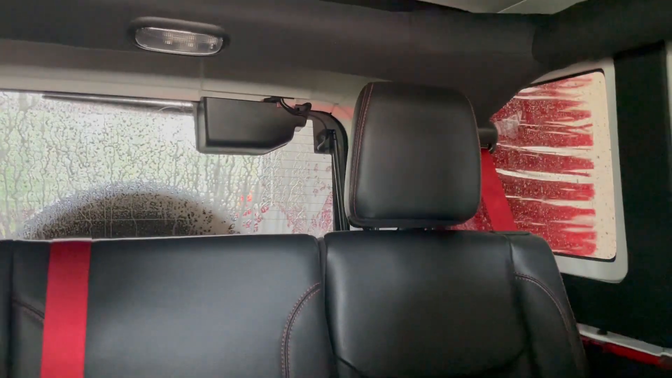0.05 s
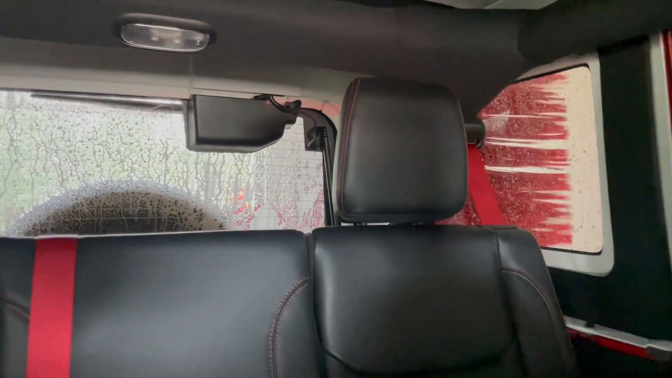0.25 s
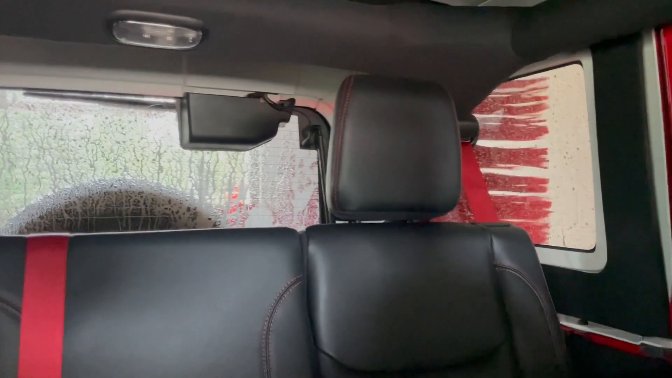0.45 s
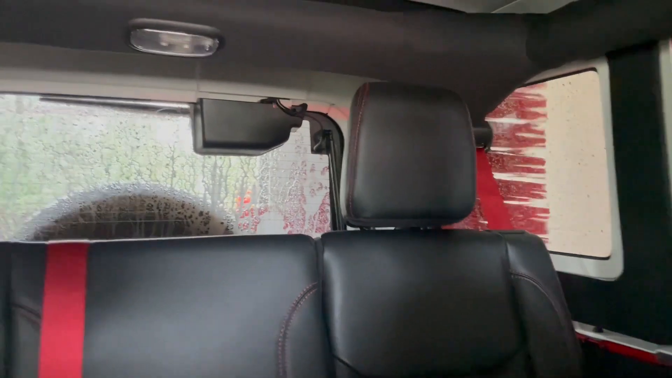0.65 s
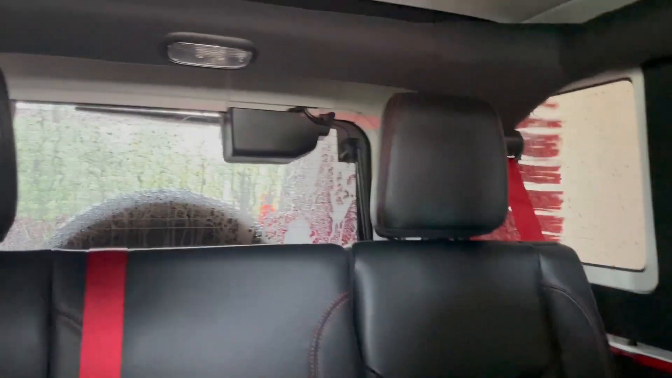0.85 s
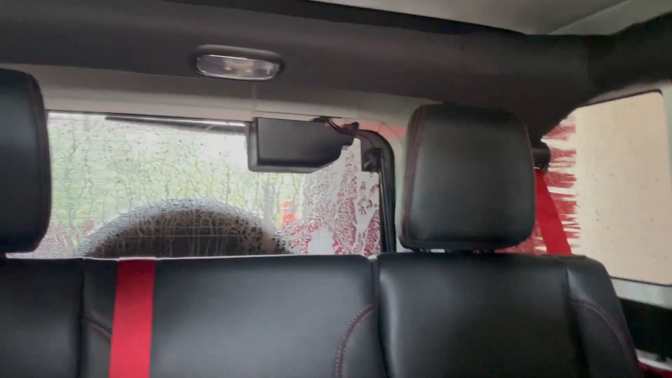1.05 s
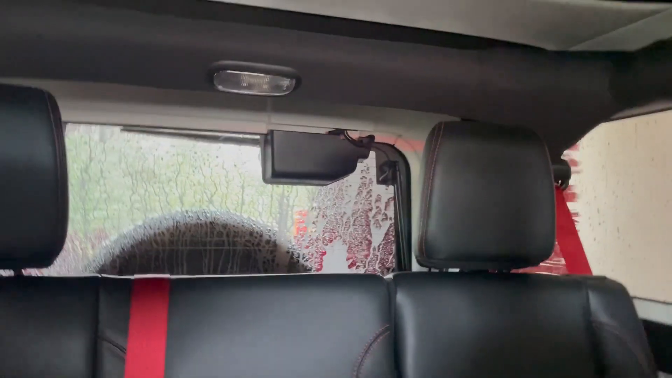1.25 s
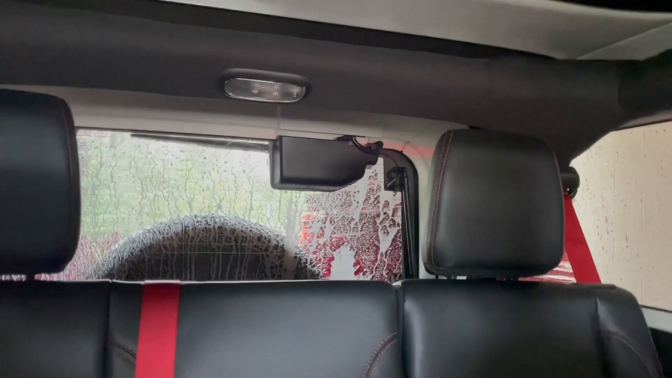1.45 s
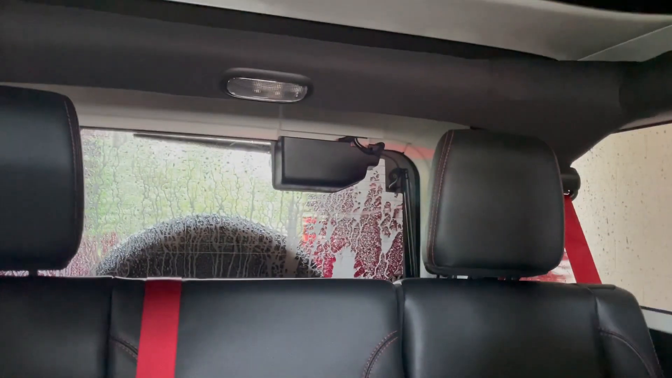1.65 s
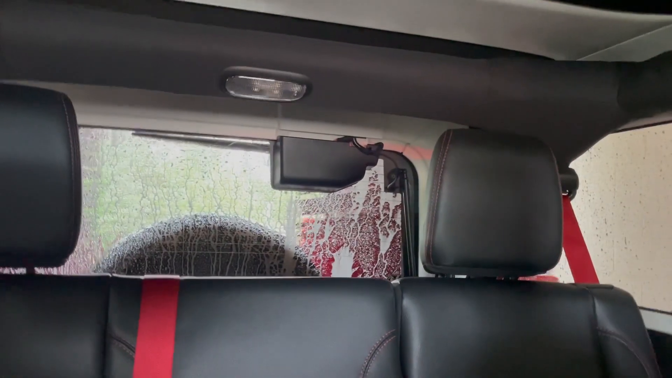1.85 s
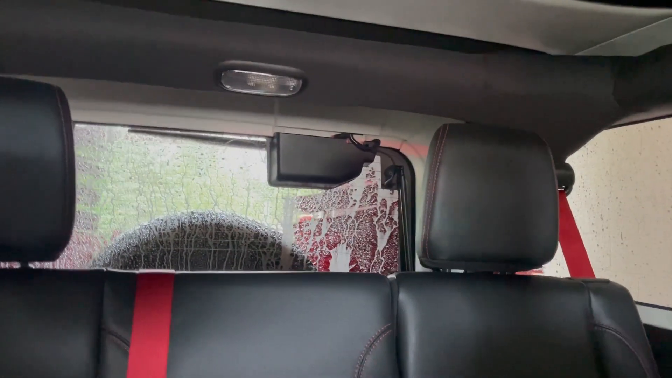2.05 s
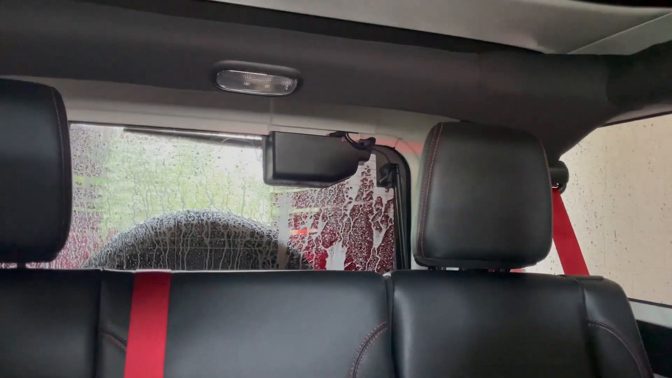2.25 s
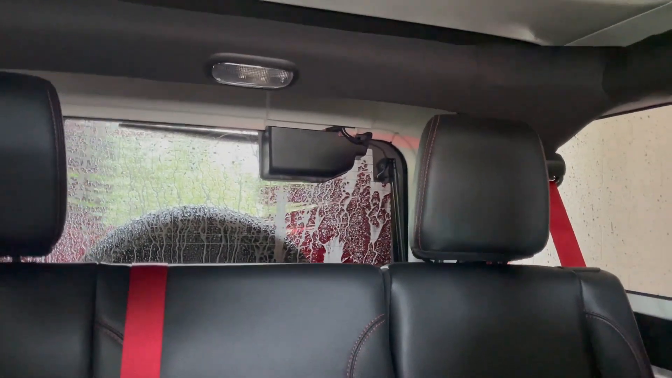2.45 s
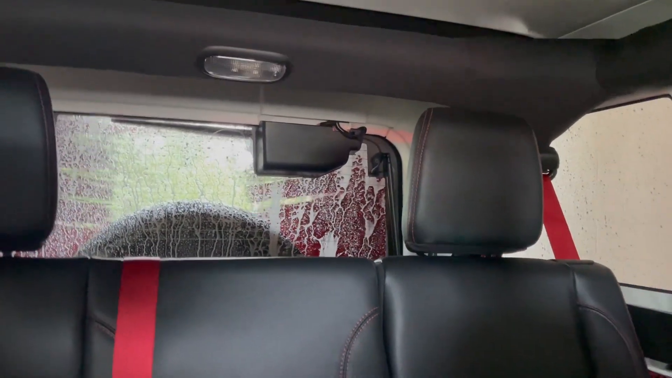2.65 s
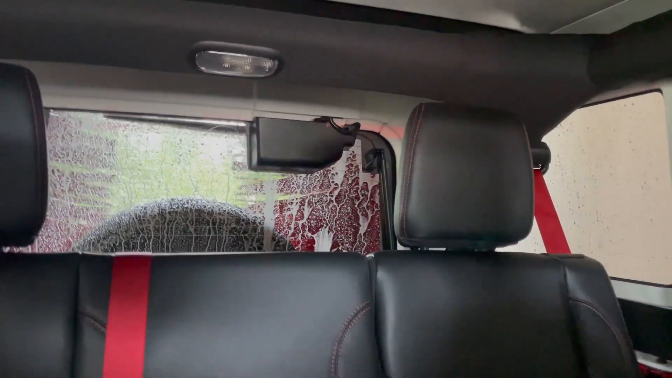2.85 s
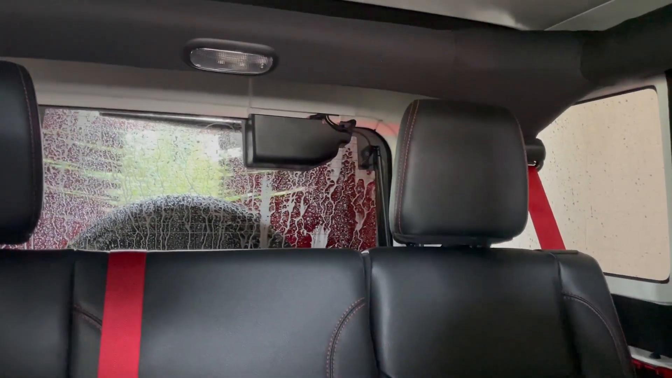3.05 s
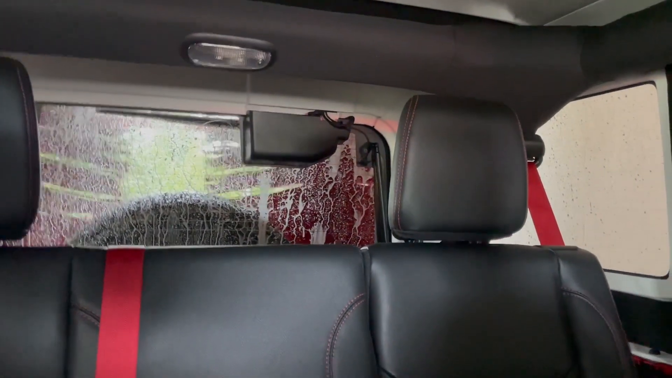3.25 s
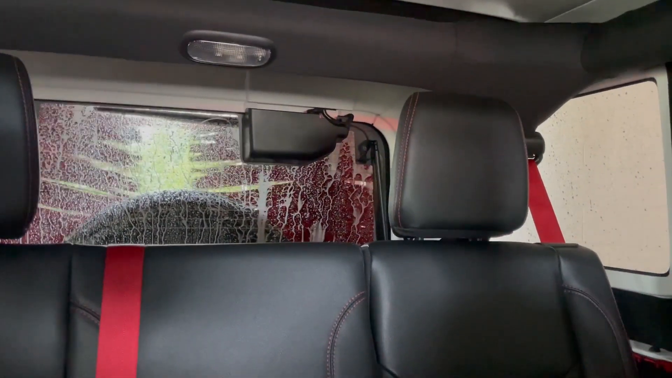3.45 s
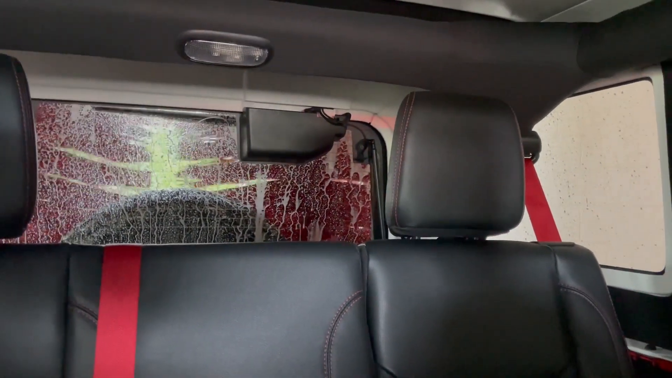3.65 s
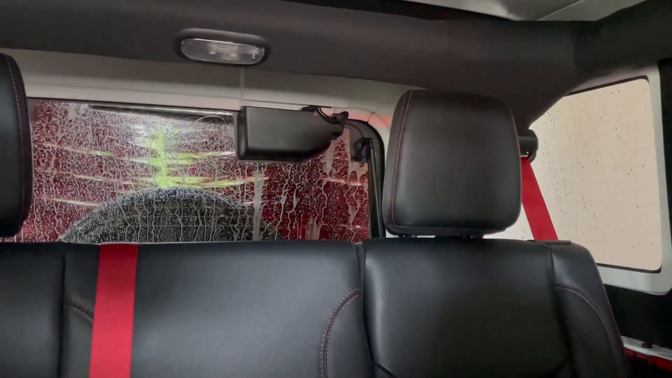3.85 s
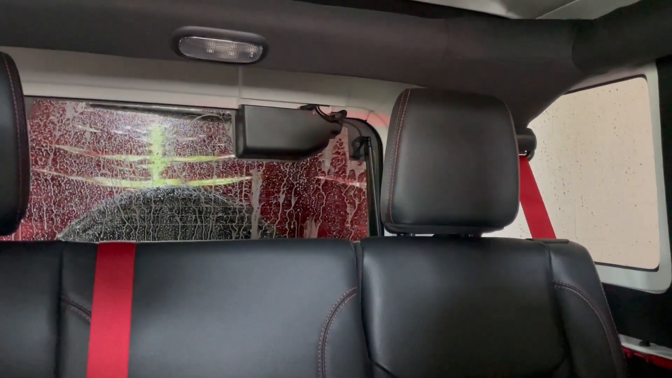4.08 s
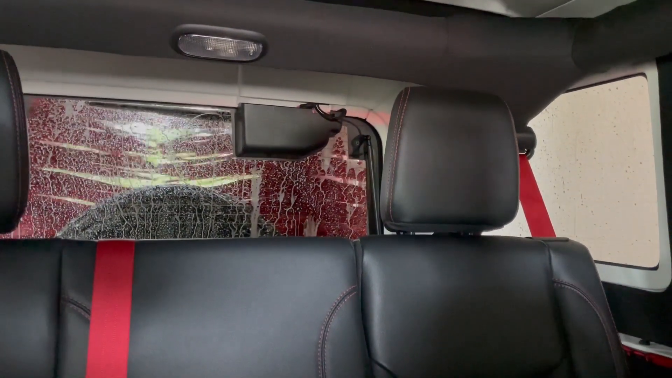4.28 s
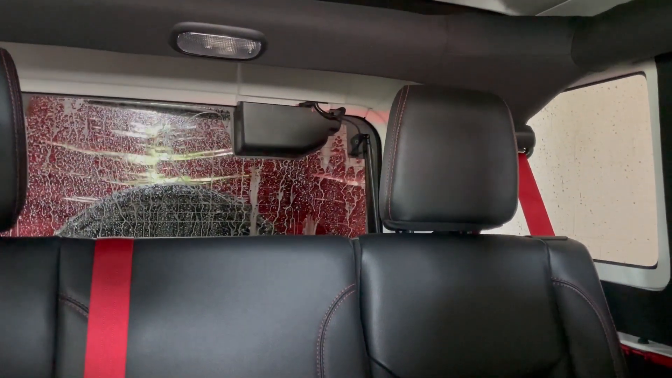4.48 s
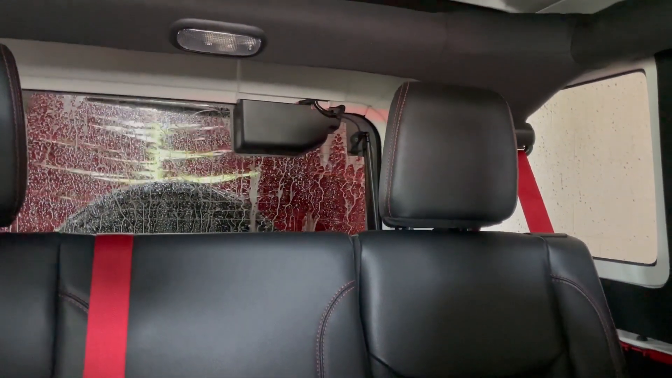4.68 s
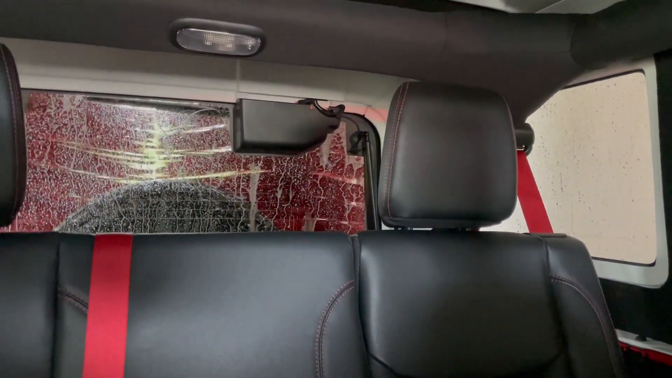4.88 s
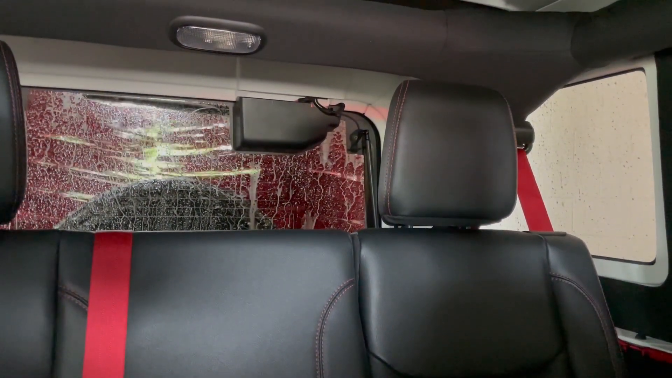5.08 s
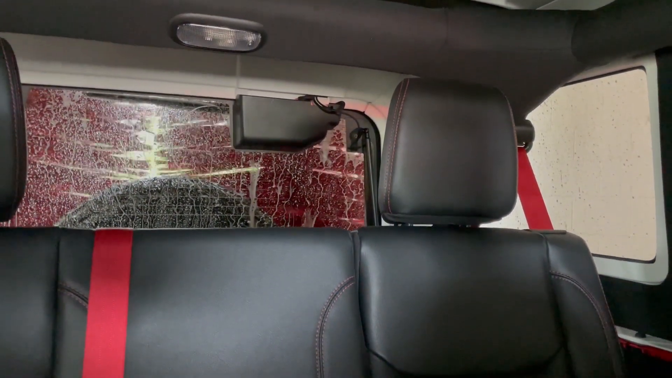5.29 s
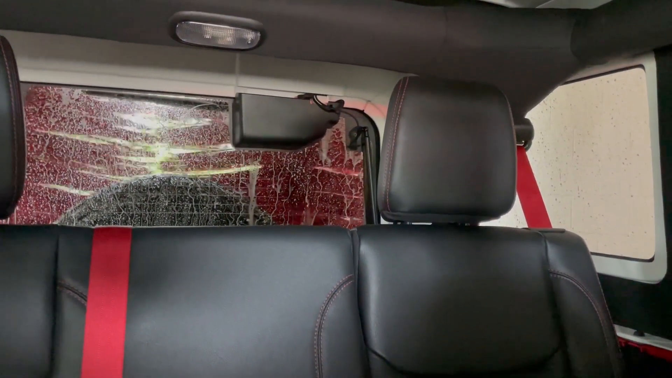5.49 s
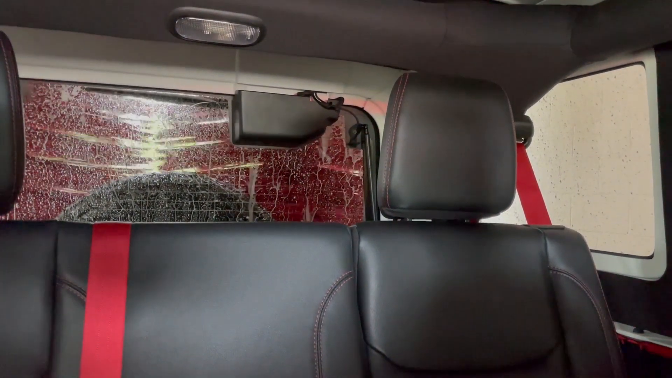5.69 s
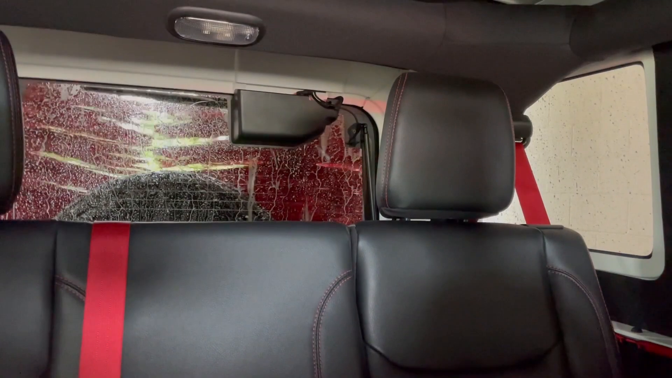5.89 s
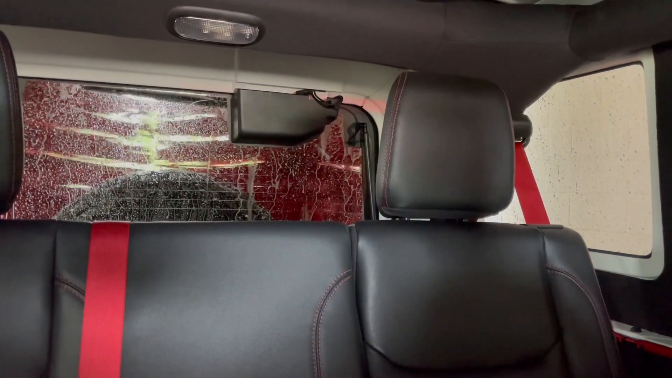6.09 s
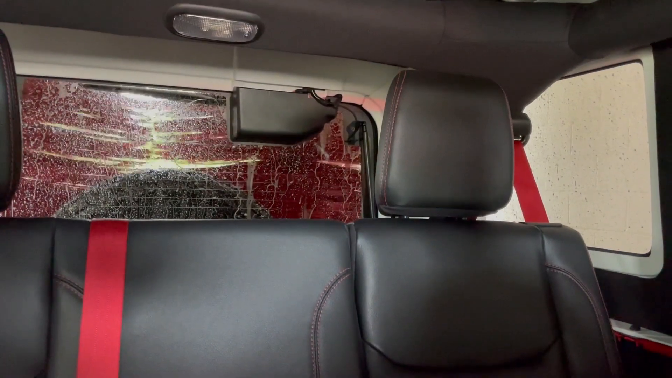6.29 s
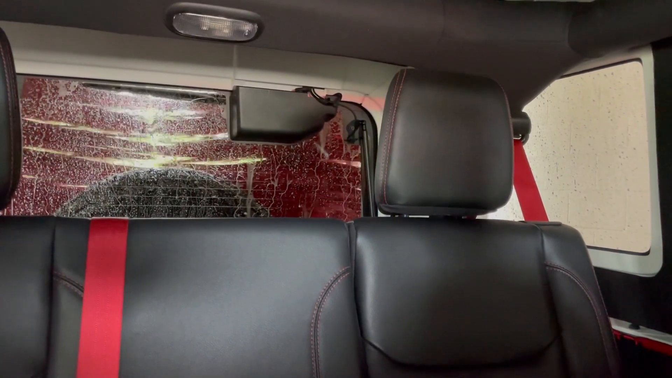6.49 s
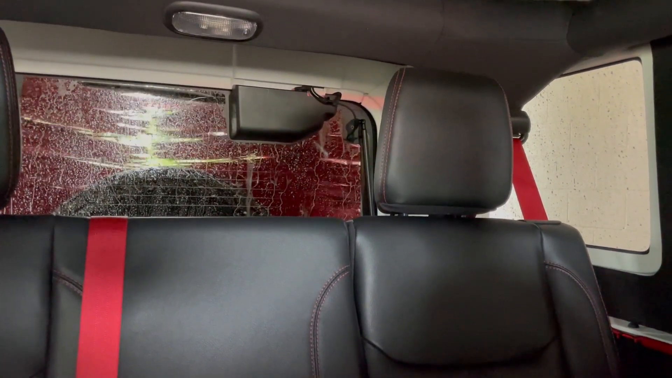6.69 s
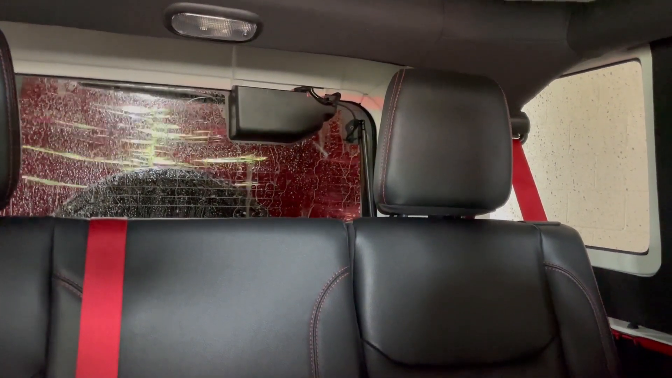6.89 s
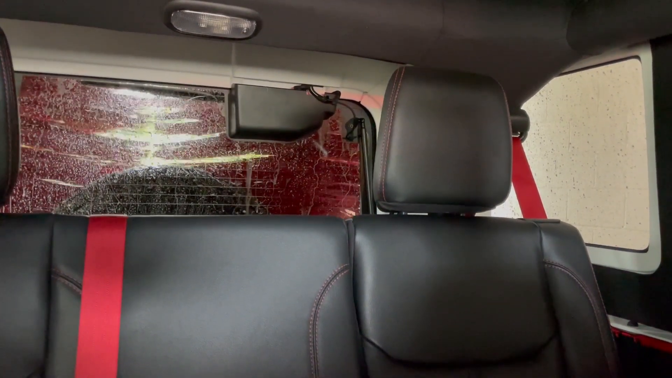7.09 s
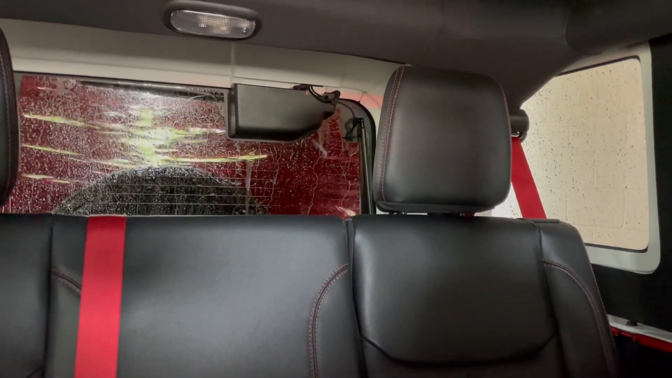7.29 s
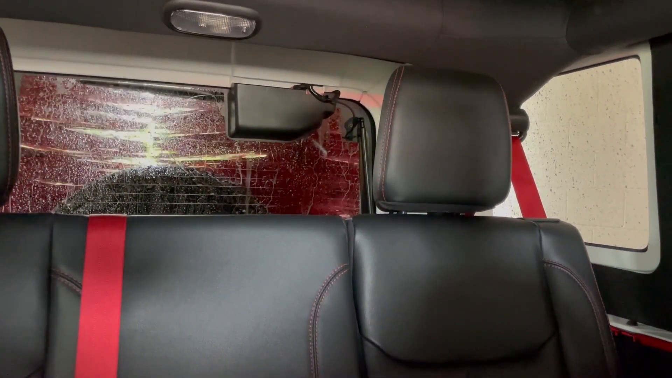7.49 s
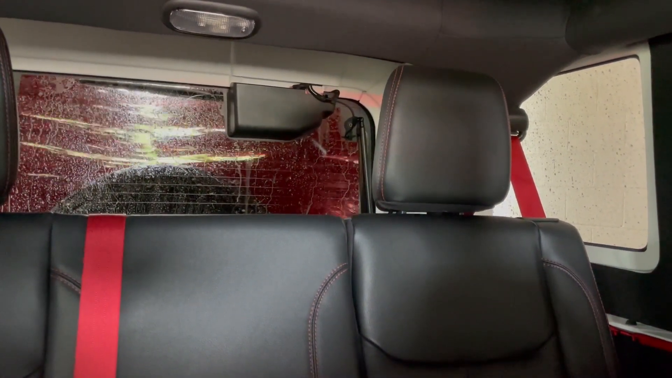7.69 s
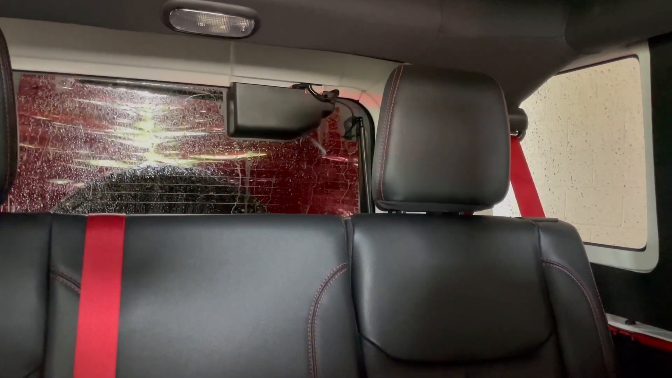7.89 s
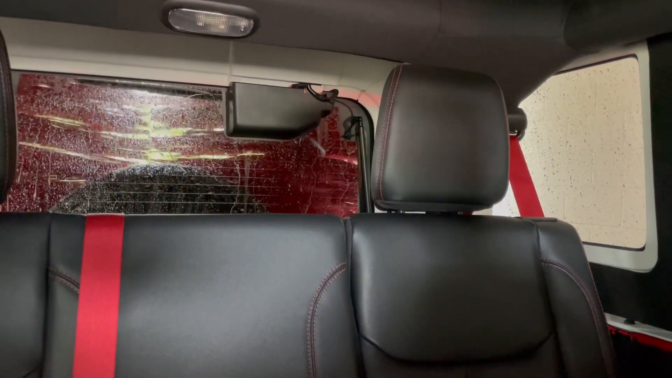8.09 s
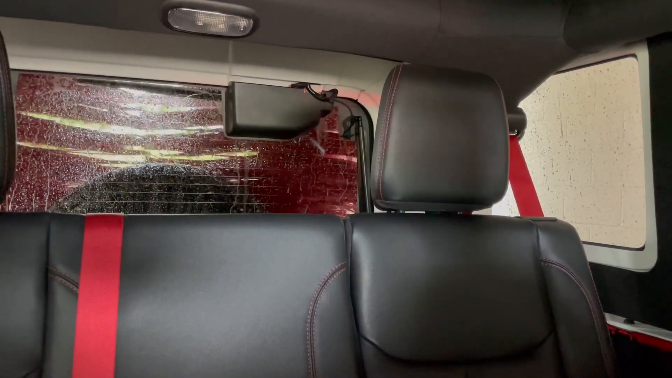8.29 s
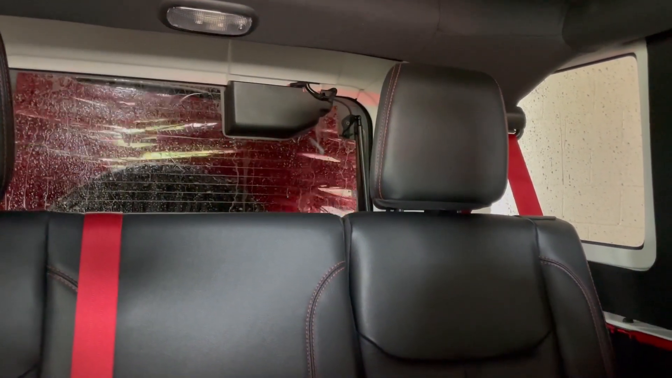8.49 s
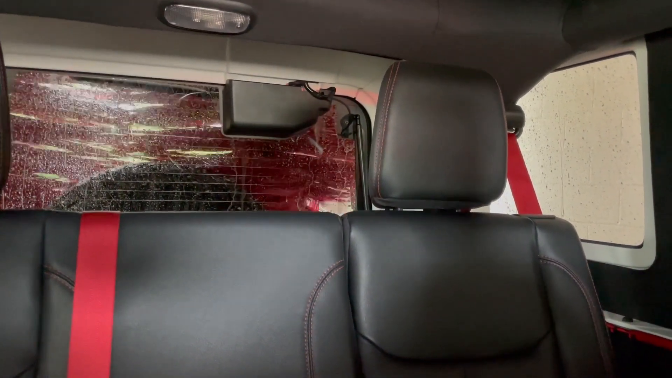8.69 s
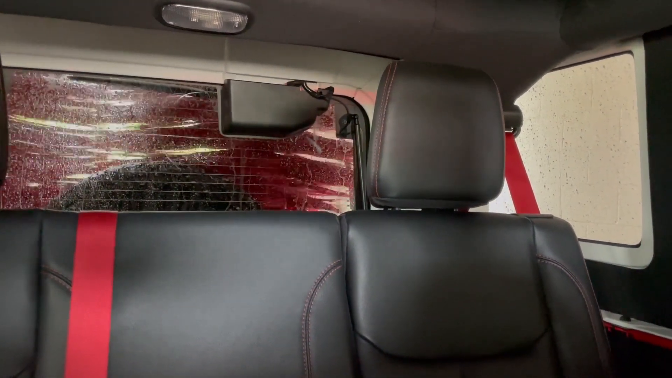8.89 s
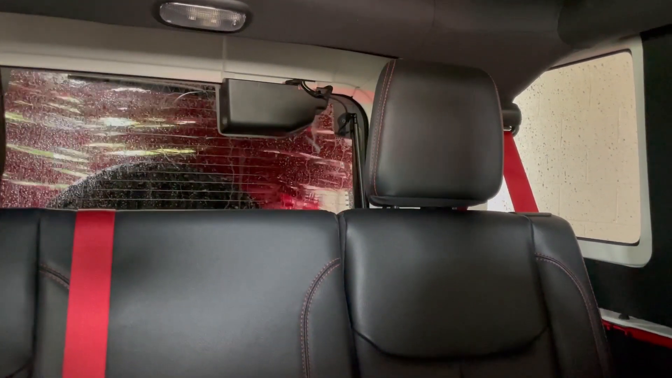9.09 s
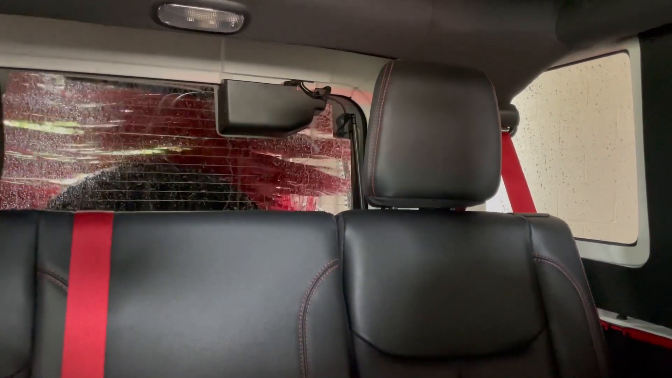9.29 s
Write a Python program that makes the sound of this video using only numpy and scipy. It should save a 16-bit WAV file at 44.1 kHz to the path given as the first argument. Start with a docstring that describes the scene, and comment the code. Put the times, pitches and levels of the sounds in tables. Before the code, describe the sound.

Inside a vehicle in an automatic car wash, a cloth brush drums on the side and fades, leaving machinery hum and a low idling engine. Brushes then reach the rear corners and close on the tailgate, their slaps building into heavy, booming drumming. Wet cloth hisses softly on the glass, a brush motor whines faintly on the left and a few drops tick. The microphone is at the seats.

```python
"""Inside a car in an automatic wash. A cloth brush leaves the side window while the engine idles over
the hum of the bay. Brushes sweep the rear corners, then close on the tailgate: their slaps drum the
body panels, boom in the cabin and swish wet on the glass. A brush motor whines faintly and a few
drops tick. Heard from the seats through a two-port microphone."""
import sys
import numpy as np
from scipy import signal
from scipy.io import wavfile
from scipy.ndimage import uniform_filter1d

SR = 44100
rng = np.random.default_rng(int(sys.argv[2]) if len(sys.argv) > 2 else 0)


def store_wav(level_fs):
    """Save 16-bit WAV to argv[1]."""
    pcm = np.round(np.clip(np.atleast_2d(level_fs), -1, 1) * 32767)
    wavfile.write(sys.argv[1], SR, pcm.T.astype(np.int16))


N = 411894

# microphone ports: f/Hz, coherence/0-1, right lead/half-turns, left minus right/dB
PORTS = [(60, .97, 0, .5), (140, .9, -.03, 1.5), (215, .95, -.06, .2), (320, .95, -.08, 1.4),
         (385, .7, 0, 1), (460, .78, 0, 3.3), (560, .15, -.1, 4.5), (800, .35, .7, 2.5), (860, .1, .4, 2.5),
         (935, .6, -.1, 2), (1010, .08, 0, 3), (1350, .1, .1, -.5), (1700, .3, .3, 1.5),
         (1950, .58, .06, 2.5), (2600, .6, -.3, 3.5), (3200, .45, -.4, 3), (4900, .65, -.2, 3.6),
         (5500, .4, .22, 3), (6900, .58, .45, 1.5), (7500, .83, .86, .4), (8300, 1, 1, 0), (9000, 1, 1, 0),
         (9700, .8, 1.2, 0), (11500, .75, 1.56, 0), (12500, .82, 1.8, 0), (13200, 1, 2, 0)]
# wet cloth and spray on the glass: t/s, level/dB
SWISH_LEVEL = [(0, -64), (.4, -66), (.9, -66.5), (1.9, -72), (2.6, -72.5), (3.3, -76), (3.75, -71.5),
               (3.95, -66.5), (4.1, -68.5), (5.04, -69.5), (5.5, -65), (6.35, -57), (7.28, -55),
               (8.35, -54.5), (9.34, -57)]
# brush contact at the rear corners and spare wheel: t/s, level/dB
CORNER_CONTACT = [(2.5, -56.5), (2.85, -52), (3.2, -55), (3.5, -50), (3.58, -47), (3.8, -43), (4.1, -44),
                  (4.37, -44), (4.44, -45), (4.6, -45.5), (5.3, -46), (5.45, -42.5), (5.8, -45)]
# brush contact at the tailgate: t/s, level/dB
REAR_CONTACT = [(5.5, -49.5), (5.8, -39.5), (6.3, -36.5), (6.9, -35), (7.3, -32.5), (8.0, -32.5),
                (8.28, -30.5), (8.42, -34), (8.7, -32.5), (8.82, -35), (9.0, -36), (9.2, -35),
                (9.34, -38.5)]
# tailgate resonances: f/Hz, width/Hz, lift/dB
TAILGATE_MODES = [(215.3, 43, 5.8), (371.4, 15, 7.6), (438.2, 26, 8.3), (705, 83, 7.1), (807, 130, 4.4),
                  (940.5, 29.5, 10.5)]


def gain_of(db):
    """Decibels to amplitude."""
    return 10 ** (np.asarray(db) / 20)


def pan(left_db):
    """Stereo gains, left_db apart."""
    return gain_of([[left_db / 2], [-left_db / 2]])


def unit_rms(x):
    """Scale to rms 1."""
    return x / np.sqrt(np.mean(x ** 2) + 1e-20)


def over_frequency(rows, hz):
    """Table columns interpolated over log frequency."""
    row_hz, *columns = np.transpose(rows)
    return [np.interp(np.log(hz + 1), np.log(row_hz + 1), c) for c in columns]


def over_time(rows):
    """A gate, shut outside the table's span, then its columns interpolated per sample."""
    row_s, *columns = np.transpose(rows)
    t = np.arange(N) / SR
    since_start_s = t - row_s[0] + (row_s[0] < .02)  # no fade at either end of the scene
    until_end_s = row_s[-1] - t + (row_s[-1] > t[-1] - .02)
    gate = np.clip(np.minimum(since_start_s, until_end_s) * 20, 0, 1)
    return [gate] + [np.interp(t, row_s, c) for c in columns]


def wander(span_s):
    """Random drift of rms 1, smoothed over span_s."""
    steps = np.arange(0, N + 32, 32)
    width = max(int(span_s * SR / 32), 2)
    slow = uniform_filter1d(uniform_filter1d(rng.standard_normal(len(steps)), width), width)
    return np.interp(np.arange(N), steps, unit_rms(slow))


def cabin_noise(spectrum, modes, fft_size, patchy_db, count=N, ports=PORTS):
    """Stereo noise of rms 1: patchy random spectra, lifted at the modes, partly shared by the ports."""
    frames = 4 * count // fft_size + 5
    hz = np.fft.rfftfreq(fft_size, 1 / SR)
    left_re, left_im, other_re, other_im, patches = rng.standard_normal((frames, len(hz), 5)).T
    patches = unit_rms(uniform_filter1d(uniform_filter1d(patches, fft_size // 64, 0), 6, 1))
    modes_db = sum(db / (1 + (2 * (hz - f) / width) ** 2) for f, width, db in modes)
    octaves_above = np.log2(np.maximum(hz / spectrum[-1][0], 1))
    octaves_below = np.log2(np.maximum(spectrum[0][0] / (hz + 1), 1))
    shape_db = over_frequency(spectrum, hz)[0] - 12 * octaves_above - 18 * octaves_below + modes_db
    coherence, lead, left_db = (c[:, None] for c in over_frequency(ports, hz))
    left = left_re + 1j * left_im
    unshared = np.sqrt(1 - np.clip(coherence, 0, 1) ** 2) * (other_re + 1j * other_im)
    right = np.exp(1j * np.pi * lead) * (coherence * left + unshared)
    bins = np.array([left * gain_of(left_db / 2), right / gain_of(left_db / 2)])
    bins *= gain_of(shape_db[:, None] + patchy_db * patches)
    _, noise = signal.istft(bins, nperseg=fft_size, noverlap=3 * fft_size // 4)
    return unit_rms(noise[:, :count])


def tone(rows, waver_hz, span_s, left_db):
    """Sine of wavering pitch; the right port leads slightly."""
    gate, hz, level_db = over_time(rows)
    phase = 2 * np.pi * np.cumsum(hz + waver_hz * wander(span_s)) / SR
    return gate * gain_of(level_db) * np.sqrt(2) * np.sin([phase, phase + 0.31]) * pan(left_db)


def brush(contact, spectrum, modes, flutter_db, left_db, ports=PORTS):
    """Dense slaps of cloth merge into panel noise, fluttering as the strips come round."""
    gate, contact_db = over_time(contact)
    touching = gate > 0
    panels = np.zeros((2, N))
    panels[:, touching] = cabin_noise(spectrum, modes, fft_size=8192, patchy_db=1.02,
                                      count=touching.sum(), ports=ports)
    return gate * gain_of(contact_db + 2 + flutter_db * wander(0.012)) * panels * pan(left_db)


def slaps(rows, mode_hz, waver_hz, left_db, sharpness, bed_db):
    """Each slap swells a wavering mode, in phase at its crest with a sustained bed at mode_hz."""
    out = np.zeros((2, N + SR))
    drift_turns = rng.random() + np.cumsum(waver_hz * wander(0.0248)) / SR
    for centre_s, length_s, hz, db in rows:
        t = np.arange(0, length_s, 1 / SR)
        start = round((centre_s - length_s / 2) * SR)
        span = slice(start, start + len(t))
        phase = 2 * np.pi * (hz * (t - length_s / 2) + mode_hz * centre_s + drift_turns[span])
        swell = np.sin(np.pi * t / length_s) ** sharpness
        out[:, span] += gain_of(db) * np.sqrt(2) * swell * np.sin([phase, phase + 0.23])
    phase = 2 * np.pi * (mode_hz * np.arange(N) / SR + drift_turns)
    bed = gain_of(bed_db) * np.sin([phase, phase + 0.22])
    return (out[:, :N] + bed) * pan(left_db)


def ringing(rows, hz, width_hz, offset_db):
    """One mode shaken by countless small slaps: amplitude and phase drift at random."""
    gate, level_db = over_time(rows)
    drift = wander(.5 / width_hz) + 1j * wander(.5 / width_hz)
    mode = drift * np.exp(2j * np.pi * hz * np.arange(N) / SR)
    return gate * gain_of(level_db + offset_db) * np.real([mode, mode * np.exp(.22j)])


def bay_hum():
    """Bay machinery: low noise coloured by the gantry's modes."""
    level = [(0, -46), (1.7, -42), (3, -44), (5.5, -45.5), (9.34, -38)]  # t/s, level/dB
    spectrum = [(18, -25), (28, -10), (38, -10), (50, -5.5), (64, -5.5), (75, -9), (105, -6), (130, -8),
                (165, -15.5), (300, -22), (650, -24), (1100, -37), (1500, -39), (2200, -40.5),
                (3300, -41.5), (4500, -50.5)]  # f/Hz, density/dB
    gantry_modes = [(85.6, 33, 6.1), (211, 17.6, 11.7), (397, 27, 4.8), (1497, 150, 7.5), (1946, 29, 9)]  # f/Hz, width/Hz, lift/dB
    hum = cabin_noise(spectrum, gantry_modes, fft_size=8192, patchy_db=0.85)
    return gain_of(over_time(level)[1]) * hum


def engine_idle():
    """Firing tone of the idling engine."""
    firing = [(0, 33.55, -45), (1.3, 33.5, -44), (2.6, 33.65, -44.5), (3.46, 33.8, -45.5), (3.6, 33.8, -67),
              (3.7, 33.4, -56), (4.1, 34.1, -49), (4.2, 33.9, -62)]  # t/s, f/Hz, level/dB
    return tone(firing, waver_hz=0.35, span_s=0.19, left_db=-1)


def motor_whine():
    """Faint, unsteady brush motor tone on the left."""
    whine = [(1.86, 649.4, -67), (2.05, 649, -66), (2.2, 649, -61.5), (2.32, 650, -59), (2.43, 649, -66),
             (2.5, 659, -66), (2.58, 650, -76), (2.67, 651, -74), (2.73, 647, -63.5), (2.95, 652, -63),
             (3.02, 648, -70), (3.2, 651, -68), (3.36, 647, -71), (3.42, 652, -64), (3.6, 649, -69),
             (3.8, 647, -68), (4.0, 651, -59.5), (4.2, 655, -74), (4.52, 647, -59), (4.62, 644, -69),
             (4.8, 660, -63), (5.0, 643, -73), (5.44, 637, -66), (6.3, 645, -63.5), (6.55, 645, -58.5),
             (6.96, 644, -56.5), (7.15, 640, -60), (7.27, 643, -50), (7.42, 643, -50), (7.62, 641, -54.5),
             (7.78, 642.5, -60), (7.95, 641, -55), (8.06, 640, -59), (8.14, 638, -49), (8.27, 638, -49.5),
             (8.43, 642, -61), (8.55, 641, -55.5), (8.75, 643, -54), (8.87, 645, -64.5), (9.15, 639, -49.5),
             (9.34, 654, -68)]  # t/s, f/Hz, level/dB
    return tone(whine, waver_hz=2, span_s=0.0451, left_db=11) * gain_of(1.2 * wander(0.03))


def drops():
    """Each drop briefly rings five modes of the pane, with a splash of noise."""
    ticks = [(2.6112, -55, 4100, .02, 1.3), (4.498, -54, 4500, 0.008, 0.44), (5.376, -60, 4030, 0.04, .2),
             (5.442, -46, 3770, .009, 0.1)]  # t/s, level/dB, f/Hz, t60/s, low modes/ratio to main
    out = np.zeros(N)
    t = np.arange(1200) / SR
    attack = 1 - np.exp(-t / 0.00023)
    splashes = 0.45 * uniform_filter1d(rng.standard_normal((len(ticks), len(t))), 4, axis=1)
    for (start_s, db, hz, t60_s, low_gain), splash in zip(ticks, splashes):
        modes = [(.42, low_gain), (.55, low_gain), (.71, low_gain), (1, 1), (1.7, .4)]
        ring = sum(gain * np.sin(2 * np.pi * ratio * hz * t) for ratio, gain in modes)
        start = round(start_s * SR)
        out[start:start + len(t)] += gain_of(db - 60 * t / t60_s) * attack * (ring + splash)
    return out * pan(left_db=5)


def whistles():
    """Thin wavering lines that follow the hiss once the brushes reach the rear."""
    lines = [(2624, -19, 12), (2880, -22, 10), (4820, -20.5, 18), (1590, -14, 40), (1695, -18, 15)]  # f/Hz, level re swish/dB, waver/Hz
    out = np.zeros((2, N))
    for hz, offset_db, waver_hz in lines:
        rows = [(s, hz, db + offset_db) for s, db in SWISH_LEVEL if s > 3.7]
        out += tone(rows, waver_hz, span_s=0.02246, left_db=7) * gain_of(3.4 * wander(0.038))
    return out


def swish():
    """Wet hiss on the glass, flickering as strips land and lift."""
    spectrum = [(700, 2), (1300, 2.5), (1720, 5), (1850, -3.5), (3500, -2), (5390, -4.5), (5460, -10),
                (6000, -7), (9000, -4.5), (12500, -11), (14000, -12), (15200, -23)]  # f/Hz, density/dB
    glass_modes = [(1100, 21, 2.6), (1218, 35, 7.7), (1544, 120, 3.5), (1966, 33, 8.8), (2610, 87, 6.5),
                   (4380, 95, 3.4), (5440, 68, 3.1)]  # f/Hz, width/Hz, lift/dB
    level_db = over_time(SWISH_LEVEL)[1] + 3.24 + 1.04 * wander(0.016) + 0.49 * wander(0.067)
    return gain_of(level_db) * cabin_noise(spectrum, glass_modes, fft_size=2048, patchy_db=0.8)


def side_brush():
    """Cloth drums the door, fading as the brush leaves the side window."""
    contact = [(0, -33), (.11, -32.5), (.2, -34.5), (.33, -35), (.39, -37.5), (.5, -35.5), (.58, -36.5),
               (.68, -38), (1., -40), (1.28, -46), (1.38, -44.5), (1.61, -49), (1.65, -59), (1.9, -61)]  # t/s, level/dB
    spectrum = [(40, -15), (90, 4.5), (130, 0.5), (170, -12), (200, -4), (280, -6.5), (380, -0.5),
                (435, -7), (480, -5), (720, -5), (760, -13), (1500, -19), (2100, -26), (3500, -28.5),
                (4600, -36.5)]  # f/Hz, density/dB
    door_modes = [(215, 12.3, 12), (241.5, 15, 13), (306, 69, 5.5), (497, 51, 6.5), (852, 39, 7.5),
                  (960, 19, 6), (1410, 120, 4)]  # f/Hz, width/Hz, lift/dB
    ports = [(60, .95, -0.04, 3), (195, 0.9, .04, .5), (310, .88, -0.13, 3), (400, .42, -.35, 6.5),
             (450, .45, .05, 7.5), (540, 0.55, -.2, 6.5), (656, .08, 0, 5.5), (790, 0.22, -0.031, 0),
             (950, 0.35, 0, 5), (1200, .15, 0.33, -1.5), (1450, .25, 0, -1), (1650, .62, .1, 1),
             (2000, 0.37, .1, 2.5), (2400, .7, -.15, 4), (3200, .55, -0.48, 3)] + PORTS[16:]  # f/Hz, coherence/0-1, right lead/half-turns, left minus right/dB
    return brush(contact, spectrum, door_modes, flutter_db=0.94, left_db=0, ports=ports)


def corner_brushes():
    """Cloth sweeps the rear corners and spare wheel."""
    spectrum = [(18, -22), (35, -1), (65, 2.5), (110, -5.5), (140, -23), (165, -29), (190, -7), (300, -6.5),
                (340, -14.5), (440, -14.5), (520, -19.5), (700, -25), (1000, -30.5), (2000, -40.5)]  # f/Hz, density/dB
    return brush(CORNER_CONTACT, spectrum, TAILGATE_MODES, flutter_db=1.3, left_db=-0.5)


def rear_brushes():
    """Brushes press on the tailgate; the drumming brightens towards the end."""
    spectrum = [(18, -23), (30, -3), (45, -0.5), (55, 3), (66, 0), (88, -14.5), (110, 1.5), (122, -9),
                (140, -13), (157, -14), (169, -10), (181, -9.5), (230, -7), (255, -5.5), (280, -4.5),
                (312, -5.5), (340, -17.5), (480, -17.5), (560, -26.5), (1000, -29.5), (1150, -39.5),
                (2200, -59)]  # f/Hz, density/dB
    shelf = [(5.5, -1), (6.3, -1.5), (7.2, 0.6), (8, -1), (8.7, 0.3), (9.0, 2.5), (9.34, 6)]  # t/s, gain above shelf_hz/dB
    shelf_hz = 520
    drumming = brush(REAR_CONTACT, spectrum, TAILGATE_MODES, flutter_db=1, left_db=0.1)
    upper = signal.sosfiltfilt(signal.butter(2, shelf_hz, "high", fs=SR, output="sos"), drumming)
    return drumming + (gain_of(over_time(shelf)[1]) - 1) * upper


def panel_knocks():
    """Slaps ring the door and tailgate skins; tailgate and corner ring on under the cloth."""
    knocks = [(.06, 0.032, 510, -40), (.115, 0.044, 533, -34.5), (.125, 0.036, 212, -36),
              (.165, .03, 503, -40), (.245, 0.044, 380, -38), (.345, .04, 250, -35), (.41, 0.034, 340, -33),
              (.47, 0.079, 311, -34), (.582, .03, 328, -35), (.635, .03, 540, -39), (.768, 0.026, 306, -37),
              (1.17, 0.03, 1415, -52), (1.355, 0.029, 504, -43.5), (1.4, .04, 388, -46.5),
              (1.48, 0.024, 520, -41.5), (1.605, 0.037, 480, -46), (2.86, 0.075, 385, -52),
              (3.62, 0.049, 435, -51), (3.785, 0.054, 212, -39), (3.85, 0.056, 216, -40),
              (3.96, 0.046, 224.2, -46), (3.985, 0.044, 438, -46), (4.05, .04, 450, -47),
              (4.43, 0.027, 450, -45), (4.42, 0.049, 220, -42), (4.545, .04, 362, -50.5),
              (4.945, 0.04, 252, -43), (5.08, .04, 442, -52), (5.42, 0.045, 430, -63),
              (5.559, 0.13, 219, -48.5), (5.825, 0.15, 224, -37), (6.094, 0.072, 214, -37.5),
              (6.226, 0.094, 220, -34), (6.369, 0.15, 225, -34.5), (6.662, 0.058, 221, -34),
              (6.855, 0.062, 224, -36), (7.023, 0.068, 221, -31), (7.264, 0.066, 221, -34),
              (7.425, 0.046, 221, -34), (7.624, 0.0592, 214, -35), (7.694, 0.089, 216, -27),
              (7.98, 0.07, 222.6, -32), (8.11, 0.044, 223, -38), (8.184, 0.11, 217, -29.5),
              (8.33, 0.072, 221.4, -32.5), (8.493, 0.09, 213, -28.5), (8.62, 0.11, 221.5, -32.5),
              (8.717, 0.064, 223.6, -31), (9.011, 0.17, 224, -37), (9.18, 0.07, 216.3, -37.5)]  # centre t/s, length/s, f/Hz, crest level/dB
    skin_hz = 222
    gate, contact_db = over_time(REAR_CONTACT)
    bed_db = np.where(gate > 0, contact_db, -120) - 11.5 + 2.7 * wander(.04)
    struck = slaps(knocks, skin_hz, waver_hz=4.53, left_db=0, sharpness=1.54, bed_db=bed_db)
    skin = ringing(REAR_CONTACT, skin_hz, width_hz=22.9, offset_db=-11)
    corner = ringing(CORNER_CONTACT, hz=438, width_hz=28, offset_db=-16)
    return struck + skin + corner


def cabin_boom():
    """Heavy slaps drive the lowest cabin and body modes; one cabin mode rings on between them."""
    thumps = [(2.46, 0.13, 93, -42), (2.63, 0.12, 83, -45), (2.72, 0.08, 91, -48),
              (3.146, 0.11, 89.5, -38.5), (3.278, 0.19, 62, -43.5), (3.596, 0.11, 84.9, -56),
              (3.716, 0.42, 64.5, -44), (3.801, 0.12, 85.2, -42), (4.022, 0.24, 91.7, -40.5),
              (4.13, 0.097, 87.2, -39), (4.162, 0.28, 64.4, -42), (4.262, 0.15, 83, -41),
              (4.386, 0.15, 91, -45), (4.534, 0.07, 87.8, -36), (4.612, 0.34, 67, -40),
              (4.638, 0.09, 90.2, -40), (4.736, 0.12, 90, -41), (4.843, 0.12, 88.4, -49),
              (5.038, 0.32, 85.8, -39), (5.146, 0.37, 68.5, -37.5), (5.179, 0.08, 84.7, -56),
              (5.297, 0.058, 91.9, -38), (5.461, 0.17, 90, -35), (5.485, 0.14, 67, -42),
              (5.792, 0.33, 88.4, -33.5), (5.947, 0.0727, 88.6, -32.5), (6.065, 0.075, 87.4, -28),
              (6.192, 0.085, 83.7, -36), (6.323, 0.15, 91.4, -29.5), (6.474, 0.18, 91.7, -31.5),
              (6.67, 0.12, 91.5, -27), (6.77, 0.06, 90.6, -30), (6.948, 0.12, 88, -25.5),
              (7.055, 0.081, 91.3, -27), (7.162, 0.1114, 86.3, -30.5), (7.306, 0.14, 87, -23.5),
              (7.445, 0.11, 86.8, -24), (7.529, 0.064, 83, -25), (7.641, 0.15, 86, -25),
              (7.733, 0.073, 87.7, -24), (7.909, 0.47, 83.2, -22.5), (8.181, 0.18, 89.5, -26.5),
              (8.354, 0.1, 88.2, -25.5), (8.497, 0.16, 84.7, -23.5), (8.621, 0.076, 92.8, -26),
              (8.812, 0.32, 86.3, -25.5), (8.966, 0.1, 85.6, -29), (9.086, 0.11, 88.6, -26.5),
              (9.198, 0.23, 85.4, -27)]  # centre t/s, length/s, f/Hz, crest level/dB
    sustain = [(0, -67), (2, -51), (3.5, -50), (5.5, -48.5), (6.3, -29.5), (7.3, -36.5), (8.8, -33),
               (9.34, -40)]  # t/s, level/dB
    cabin_hz = 87.65
    bed_db = over_time(sustain)[1] - 5 + 2 * wander(0.037)
    struck = slaps(thumps, cabin_hz, waver_hz=2.32, left_db=0.6, sharpness=1.12, bed_db=bed_db)
    return struck + ringing(sustain, cabin_hz, width_hz=10, offset_db=-6)


def scene():
    """Stereo sum of bay, brushes, car body, motors and water."""
    bay = bay_hum()
    brushes = side_brush() + corner_brushes() + rear_brushes()
    body = cabin_boom() + panel_knocks()
    motors = engine_idle() + motor_whine()
    water = swish() + whistles() + drops()
    return bay + brushes + body + motors + water


def record(dry):
    """Steep low-pass band limit."""
    edge_hz = 15620
    lowpass = signal.firwin(511, edge_hz, window=("kaiser", 9), fs=SR)
    return signal.oaconvolve(dry, lowpass[None], "same")


dry = scene()
out = record(dry)
store_wav(out)
```